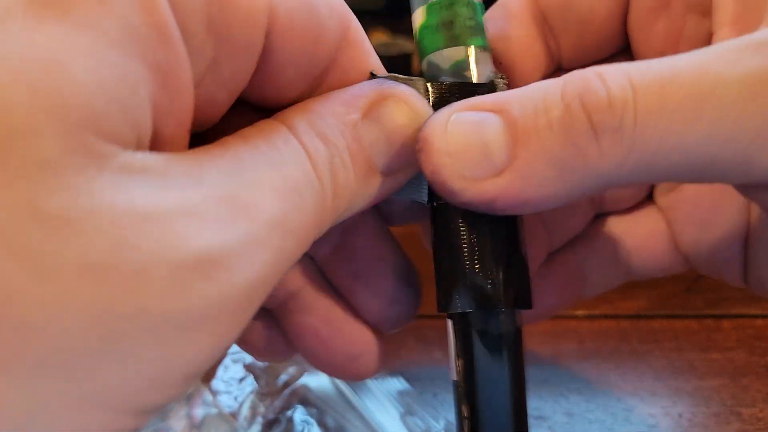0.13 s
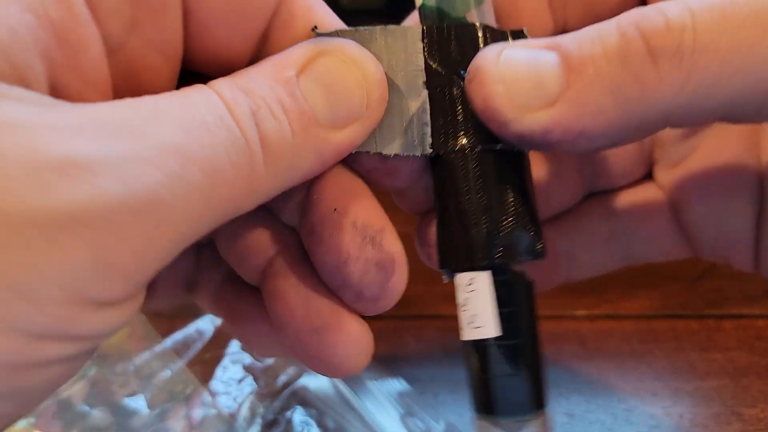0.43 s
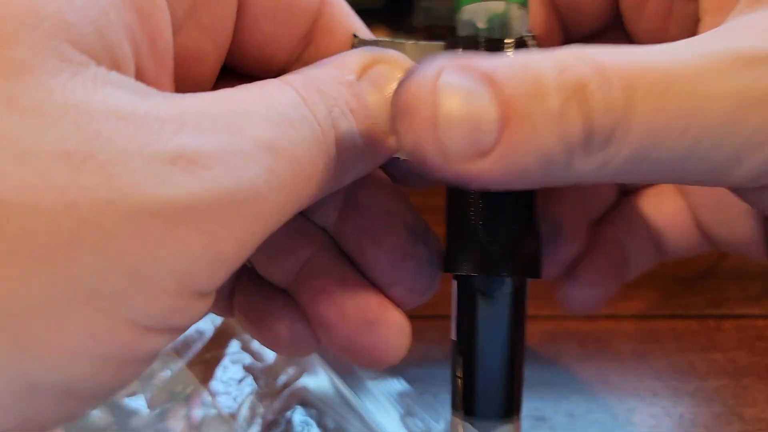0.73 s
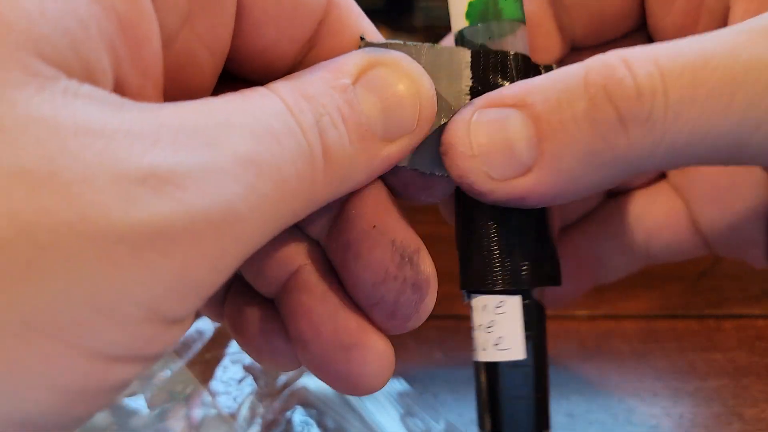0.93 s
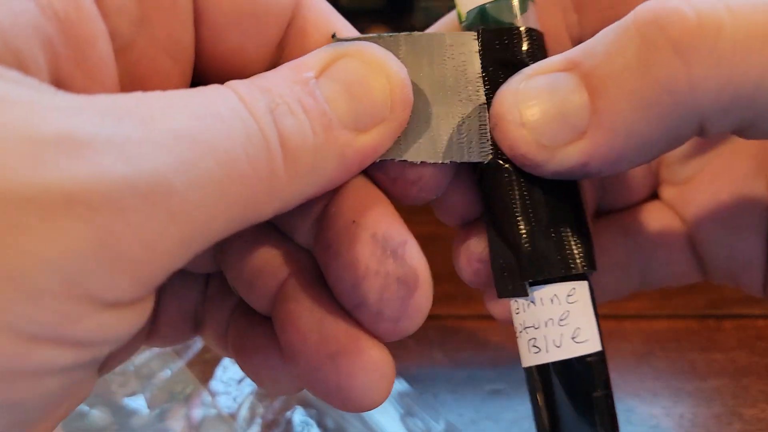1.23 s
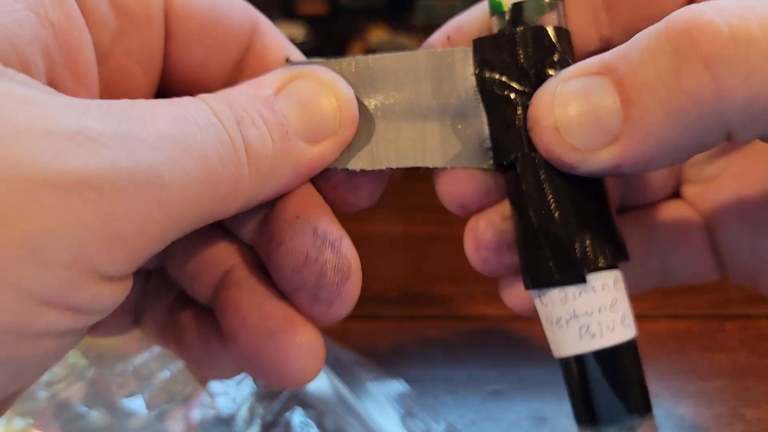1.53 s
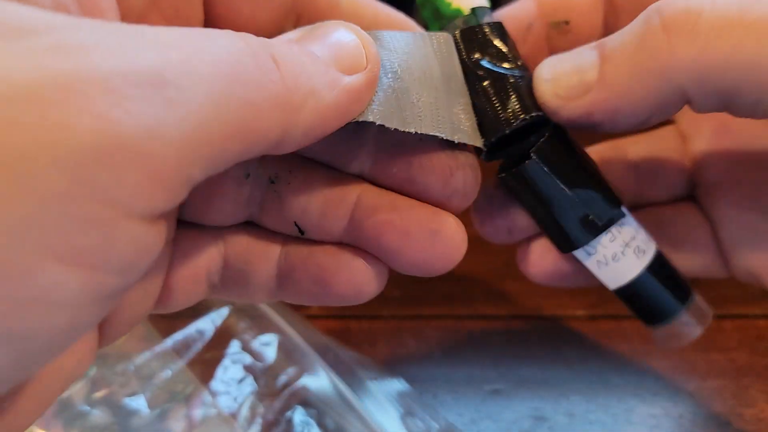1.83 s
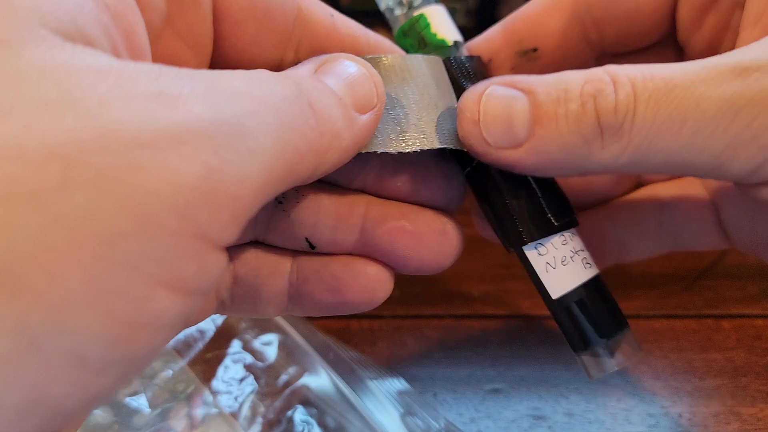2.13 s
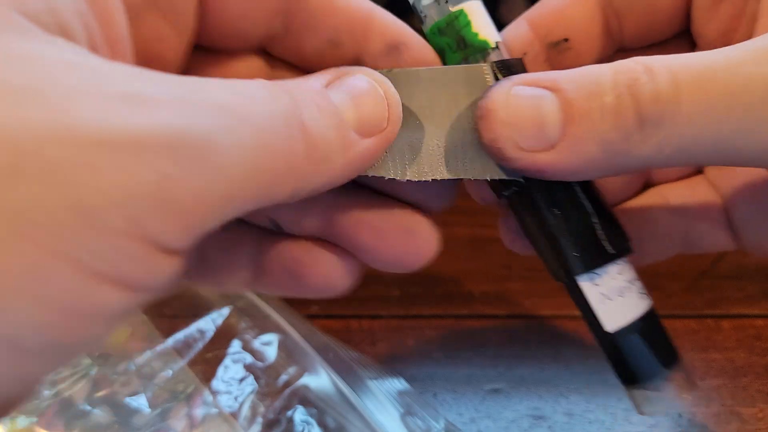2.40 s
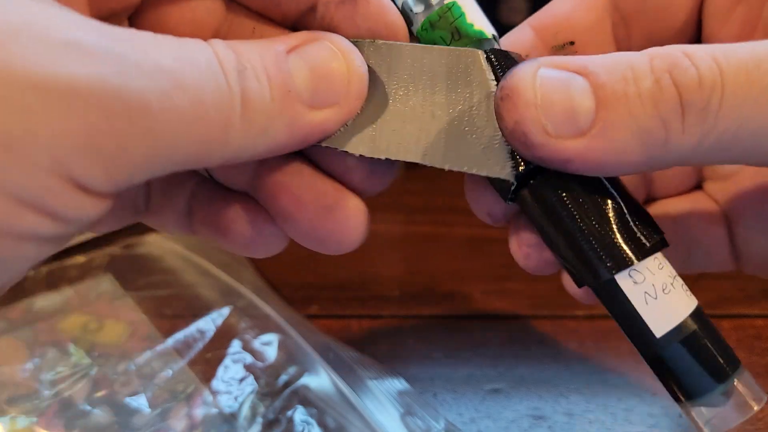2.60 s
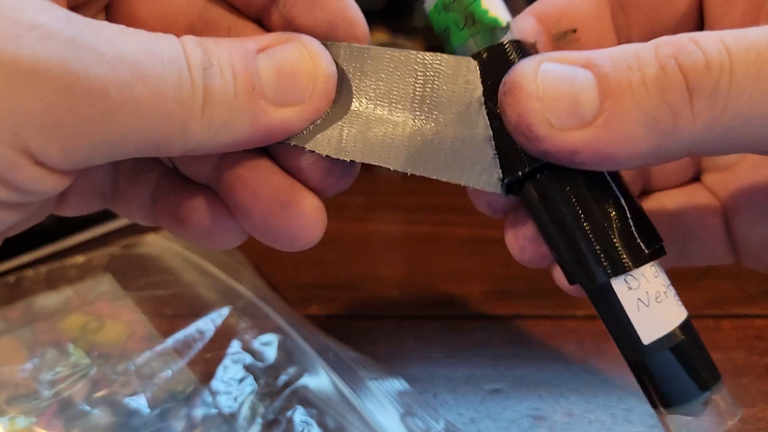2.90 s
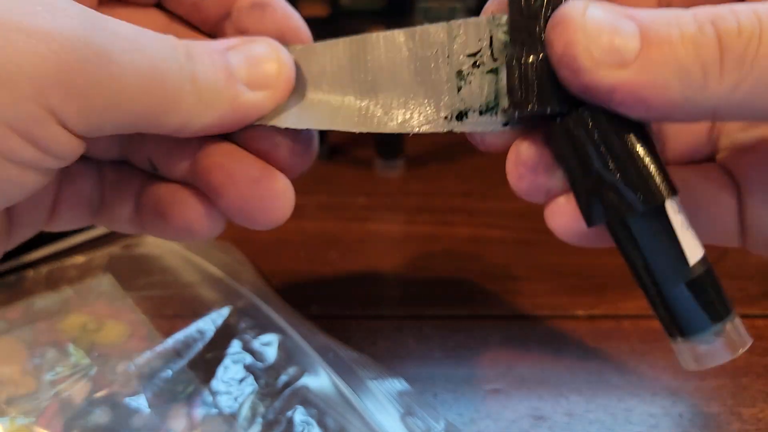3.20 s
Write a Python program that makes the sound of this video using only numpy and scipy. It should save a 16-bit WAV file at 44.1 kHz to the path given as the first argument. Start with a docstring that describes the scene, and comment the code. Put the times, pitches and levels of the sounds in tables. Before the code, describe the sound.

Sticky tape peeled from a glass vial: short hard rips with faint crackle between, indoors

```python
"""At a desk in a small room, duct tape is pulled off small glass vials close to a stereo microphone.
Glue slips drive the strip's resonance in sharp snaps and short rips, with ticks and crackle between.
Decaying sines make the soft jolts of the hands; shaped noise makes the skin's rustles and squeaks.
Scattered reflections and a short tail answer from the desk and room, over a low hum and hiss."""
import sys
import numpy as np
from scipy import signal
from scipy.fft import rfft, irfft, next_fast_len
from scipy.io import wavfile
from scipy.ndimage import map_coordinates

SR = 44100
rng = np.random.default_rng(int(sys.argv[2]) if len(sys.argv) > 2 else 0)


def waveform_to_disk(signal):
    """Save audio, clipped to [-1, 1], as 16-bit WAV at the path in sys.argv[1]."""
    frames = np.transpose(np.atleast_2d(signal))
    scaled = np.clip(frames, -1, 1) * 32767
    samples = np.round(scaled).astype(np.int16)
    wavfile.write(sys.argv[1], SR, samples)


N = 147735  # samples in the scene
FFT = next_fast_len(N + SR // 2)  # leaves room for half a second of reverberation
HZ = np.fft.rfftfreq(FFT, 1 / SR)
BURST = 4096  # samples in one glue release
BURST_HZ = np.fft.rfftfreq(BURST, 1 / SR)
HALVES = np.array([[1], [-1]]) / 2  # shares a left-right difference between the channels


def amp(db):
    """Decibel law: level to amplitude gain."""
    return 10 ** (np.asarray(db) / 20)


def unit(x):
    """Normalisation: scale to an rms of 1."""
    return x / np.sqrt(np.mean(x ** 2) + 1e-20)


def along(points, hz):
    """Logarithmic frequency scale: interpolate (Hz, value) points along it."""
    point_hz, values = np.transpose(points)
    return np.interp(np.log(hz + 1), np.log(point_hz + 1), values)


def curve(rows):
    """Envelope: interpolate (seconds, value) rows at every sample."""
    return np.interp(np.arange(N) / SR, *np.transpose(rows))


def filtered(x, response):
    """Convolution theorem: multiply the spectrum by a response on the HZ grid."""
    return irfft(rfft(x, FFT) * response, FFT)[..., :N]


def causal(db):
    """Minimum phase: fold the cepstrum so that these gains ring only after the impulse."""
    cepstrum = irfft(np.log(amp(db)))
    half = len(cepstrum) // 2
    cepstrum[1:half] *= 2
    cepstrum[half + 1:] = 0
    return np.exp(rfft(cepstrum))


def wobble(rate):
    """Band-limited fluctuation: a smooth curve through random knots, rate of them a second."""
    knots = rng.standard_normal(int(N * rate / SR) + 4)
    return map_coordinates(knots, [np.arange(N) * rate / SR])


def add(track, s, sound):
    """Superposition: mix a sound into the track from time s."""
    part = track[..., round(s * SR):][..., :sound.shape[-1]]
    part += sound[..., :part.shape[-1]]


# Response of the taut strip. Each row: frequency in Hz, gain in dB.
STRIP_RESPONSE = [(30, -31), (100, -15.5), (280, -14.5), (500, -17), (850, -12), (1500, -4), (2400, -5),
                  (3200, -6.5), (4300, -5), (5400, 0), (6500, -3.5), (8000, -11.5), (10000, -25),
                  (12700, -19.5), (16000, -24)]
# Ring of the vial in cupped hands. Each row: frequency in Hz, width in Hz, lift in dB at full share.
HOLLOW_RING = [(224, 43, 4), (325, 35, 9), (846, 90, 8), (1186, 100, 6), (1600, 510, 4), (4340, 340, 2)]
RING_DB, RING_OCTAVES = 7, .3  # lift and spread of the strip's own ring
BASS_HZ, MIDDLE_HZ, TREBLE_HZ = 486, 1300, 6900  # bass edge, middle centre, treble edge
EVEN = .6  # how strongly the random peaks and dips of the slips' spectrum are levelled


def release(length, ring_hz, bass_db, middle_db, treble_db, hollow):
    """Stick-slip excitation: a quick noisy run of tiny glue slips drives the resonant strip."""
    u = np.arange(BURST) / SR / length
    f = BURST_HZ + 1
    slips = rfft(rng.standard_normal(BURST) * u * np.exp(-2 * u))
    size = np.abs(slips) + 1e-9
    levelling = causal(-EVEN * 20 * np.log10(size + size.mean() / 2))

    hollow_db = sum(lift / (1 + (2 * (f - hz) / width) ** 2) for hz, width, lift in HOLLOW_RING)
    db = along(STRIP_RESPONSE, f) + hollow * hollow_db
    db = db + RING_DB * np.exp(-(np.log2(f / ring_hz) / RING_OCTAVES) ** 2)
    db = db + bass_db / (1 + (f / BASS_HZ) ** 2)
    db = db + middle_db * np.exp(-np.log2(f / MIDDLE_HZ) ** 2)
    db = db + treble_db / (1 + (TREBLE_HZ / f) ** 6)

    evened = slips * levelling
    return irfft(evened / np.abs(evened).mean() * causal(db))


# Sudden releases of the glue. Each row: start in seconds, relative level in dB, time scale in seconds,
# strip's ring in Hz, bass in dB, middle in dB, treble in dB, left over right in dB, share of hollow ring.
GLUE_SNAPS = [(0.1465, -2, 0.0015, 3700, -2, -6.5, -3, -2.5, 1.1),
              (0.2474, -13, .0014, 3200, -8, 3, 13, 12, 0),
              (0.2492, -1.5, 0.0013, 5200, 11.5, -1, 3.5, -4, 0.47),
              (.2777, -5, .0008, 3300, -5.5, 1, 2, -2.5, 0),
              (0.2956, 0.5, 0.00031, 3800, -0.5, -3, -13, -7.5, 0),
              (1.3597, -6.5, 0.0002, 2500, -3, -4, -24, -2.5, 1.64),
              (1.386, -1, .001, 3700, 1, 2.5, 4, 1.5, 1.5), (1.3882, -.5, .0018, 5300, 1, 2, -1.5, 3, 1.7),
              (2.4953, -25, 0.0024, 4800, 19.5, 4.5, 4.5, 1.5, 0.12),
              (2.9640, -0.5, 0.00079, 4300, 21.5, 7.5, 4.5, -3.5, 0.47),
              (2.9649, -6, 0.001, 4800, -1, 1.5, 0.5, -13.5, 0.42),
              (2.972, -11.5, .0016, 5200, 24, 5, 10, -8.5, 1.46), (2.9748, -6, .003, 4900, 25, 0, 5, 1, 1),
              (2.979, -8, .004, 5200, 21, -13, -4, -10, 0.66),
              (2.99, -23, .003, 5400, 11, 3.5, 14.5, 1, 0.21),
              (2.9953, -19.5, 0.0039, 5400, 7, 6, 3, -0.5, 0.043),
              (3.0203, -22.5, .003, 5600, 24.5, -0.5, 7.5, -7, 0.21)]
SNAP_DB = 12.5  # added to every row's level


def snaps():
    """Sudden energy release: the tape gives way in single snaps or in a run that makes a rip."""
    out = np.zeros((2, N))
    for s, db, length, hz, bass, middle, treble, pan, hollow in GLUE_SNAPS:
        gain = amp(SNAP_DB + db + pan * HALVES)
        add(out, s, gain * release(length, hz, bass, middle, treble, hollow))
    return out


# Single glue threads part. Each row: start in seconds, relative level in dB, time scale in seconds,
# strip's ring in Hz, middle in dB, treble in dB.
THREAD_TICKS = [(.0875, -47, .001, 5500, -12, 6), (0.113, -47.5, 0.0044, 5120, 0, -3),
                (0.17, -38, 0.0044, 3980, 4, 16), (0.202, -50, .001, 5000, -15, 22),
                (0.368, -35, 0.002, 3840, 6, 9.5), (.5385, -36.5, 0.00074, 3970, -8, -17),
                (0.596, -39.5, 0.0034, 5090, 8, -6.5), (0.888, -45, 0.0036, 5120, 3, -2),
                (0.9596, -39, 0.0017, 5000, -19, -6), (0.979, -35, 0.00067, 4850, -21, -4),
                (1.073, -40, 0.00078, 5600, -13, -6), (1.085, -38, 0.0058, 5460, 5, -2),
                (1.0955, -25.5, 0.0011, 4930, -31, -7), (1.128, -38.5, .002, 5360, -19, -4),
                (1.136, -33.5, 0.0052, 5140, -9, -12), (1.176, -42, 0.0024, 5500, 1, 3),
                (1.184, -37, .001, 6000, 0, 5), (1.204, -29, 0.0027, 5650, 3, 2.5),
                (1.249, -37, 0.0057, 5800, 8, 1), (1.260, -29.5, 0.0039, 5540, -4, 4),
                (1.283, -20.5, .002, 5600, -18, -2), (1.319, -28.5, .003, 5500, -5, 0.5),
                (1.338, -26.5, 0.0027, 4930, -10, -4), (1.349, -29, .005, 5500, -3, 7),
                (1.524, -34, 0.0024, 4560, -11, -13), (1.586, -35, 0.0014, 5060, -2, -8.5),
                (1.702, -39.5, 0.0072, 5500, 8.5, 6), (1.756, -34, 0.0057, 3800, -1.5, -14),
                (1.763, -29, 0.0027, 2650, -9.5, -15.5), (1.812, -34.5, 0.0017, 4240, -4, -13),
                (1.8998, -36, .002, 6480, 7.5, 0), (2.457, -41, 0.0023, 5500, -5.5, 2),
                (2.613, -49.5, .001, 5400, 11.5, 11.5), (2.6944, -45, 0.00046, 5200, 8.5, 2),
                (2.738, -43, .004, 5000, 1.5, -5.5), (2.899, -46.5, 0.0024, 5500, 3.5, 0),
                (2.938, -46, .001, 5200, -7, 4), (2.943, -26.5, 0.009, 5200, 9, 5.5)]
TICK_DB = 13.5  # added to every row's level


def ticks():
    """Local fracture: small threads of glue part, each a weak release into the strip."""
    out = np.zeros(N)
    for s, db, length, hz, middle, treble in THREAD_TICKS:
        add(out, s, amp(TICK_DB + db) * release(length, hz, 0, middle, treble, 0))
    return out


# Glue crackle under tension. Each row: time in seconds, relative level in dB.
CREEP_LEVEL = [(0, -83), (.07, -78), (.1, -60), (.22, -53), (.37, -57.5), (.42, -76), (.6, -77), (.68, -90),
               (.85, -84), (.91, -72.5), (1.05, -69), (1.12, -63), (1.37, -52), (1.6, -71.5), (1.9, -77),
               (2.0, -97.5), (2.32, -86), (2.365, -71), (2.46, -64), (2.56, -71), (2.82, -70),
               (2.94, -59.5), (3.05, -52), (3.12, -82)]
CREEP_DB = -0.5  # added to every row's level
# Spectrum of the crackle. Each row: frequency in Hz, gain in dB.
CREEP_SPECTRUM = [(300, -36.5), (1000, -17), (1800, -5.5), (3000, -10.5), (4700, 1), (6200, 0),
                  (8500, -11.5), (11000, -18), (14000, -14.5), (16000, -20.5)]
CREEP_PER_S, CREEP_SPREAD_DB = 800, 5  # mean rate of grains, spread of their levels
CLUMPS_PER_S, CREEP_CLUMP_DB = 90, 4  # knots and depth of the slower fluctuation


def creep():
    """Random impulse process: dense faint crackle of the glue while the strip is under tension."""
    present = rng.random(N) < CREEP_PER_S / SR
    signs = rng.choice([-1, 1], N)
    sizes = amp(CREEP_SPREAD_DB * np.clip(rng.standard_normal(N), -2, 2))
    grains = present * signs * sizes * amp(CREEP_CLUMP_DB * wobble(CLUMPS_PER_S))
    crackle = unit(filtered(grains, causal(along(CREEP_SPECTRUM, HZ))))
    return crackle * amp(curve(CREEP_LEVEL) + CREEP_DB)


# Skin rustles on the tape. Each row: time in seconds, level in dB before the flutter.
HANDLING_LEVEL = [(0, -78), (.33, -64), (.45, -62.5), (.6, -71), (.72, -81), (1.1, -76), (1.55, -63),
                  (1.68, -70), (1.95, -83), (2.3, -84), (2.6, -71.5), (2.75, -63.5), (2.85, -72.5),
                  (3.15, -80.5), (3.35, -86)]
# Spectrum of the rustle. Each row: frequency in Hz, gain in dB.
HANDLING_SPECTRUM = [(100, -29), (400, 2.5), (700, -8.5), (1500, -4), (2300, -4), (4000, -13), (6000, -3.5),
                     (9000, -36.5), (16000, -30.5)]
HANDLING_FLUTTER_DB = 3


def handling():
    """Friction noise: fingers shift their grip with a soft, uneven rustle."""
    rustle = unit(filtered(rng.standard_normal(N), amp(along(HANDLING_SPECTRUM, HZ))))
    return rustle * amp(curve(HANDLING_LEVEL) + HANDLING_FLUTTER_DB * wobble(56))


# Fingers slip on the vial. Each row: centre in seconds, level in dB, pitch in Hz, half length in seconds.
FINGER_RUBS = [(1.51, -51.5, 1010, 0.0028), (2.456, -59, 855, 0.017)]
RUB_WIDTH_HZ = 206  # distance from the pitch at which the gain has halved


def rubs():
    """Band-limited friction: brief soft squeaks of skin on the vial."""
    t = np.arange(N) / SR
    out = np.zeros(N)
    for s, db, hz, half in FINGER_RUBS:
        band = 1 / (1 + ((HZ - hz) / RUB_WIDTH_HZ) ** 4)
        squeak = unit(filtered(rng.standard_normal(N), band))
        out += amp(db) * np.exp(-((t - s) / half) ** 2) * squeak
    return out


# The hands jerk as the tape gives. Each row: start in seconds, starting level in dB, frequency in Hz.
HAND_JOLTS = [(1.389, -37, 43.5), (1.393, -45.5, 123.2), (2.968, -37, 70.4), (3.026, -49.5, 48.6)]
JOLT_T60_S = .1  # time to fall by 60 dB


def jolts():
    """Damped oscillation: a soft low push as the hands jerk apart."""
    out = np.zeros(N)
    t = np.arange(SR // 4) / SR
    for s, db, hz in HAND_JOLTS:
        add(out, s, amp(db - 60 * t / JOLT_T60_S) * np.sin(2 * np.pi * hz * t))
    return out


# The two microphone ports. Each row: frequency in Hz, left over right in dB, left's phase lead in radians.
MICROPHONE_PORTS = [(100, -4, .3), (300, -2, .4), (850, 0, .6), (1700, -1, 1.8), (2600, -3, 2.4),
                    (3800, -1, 2.1), (4800, 1, 1.8), (5700, 4, 2.2), (7500, 7, 4.3), (10000, 1, 5.3),
                    (12700, -12, 7.3), (16000, -8, 8.3)]
PORT_LEAN = np.array(MICROPHONE_PORTS)[:, :2]
PORT_LEAD = np.array(MICROPHONE_PORTS)[:, ::2]


def ports(x):
    """Interaural-style phase difference: direct sound reaches the left port first."""
    return filtered(x, np.exp(1j * HALVES * along(PORT_LEAD, HZ)))


# Desk and near surfaces. Each row: delay in seconds, level in dB before the room's colour.
NEAR_SURFACES = [(.0065, -23.5), (0.0144, -22.5)]
# Decay of the tail. Each row: frequency in Hz, time to fall by 60 dB in seconds.
TAIL_T60 = [(150, 0.33), (600, 0.32), (1500, 0.18), (4500, 0.19), (9000, 0.19), (15000, 0.15)]
# Colour of the whole room answer. Each row: frequency in Hz, gain in dB.
ROOM_SPECTRUM = [(100, -25), (600, -2.5), (1500, 1), (4500, 6.5), (8000, 2), (14000, 12.5)]
ROOM_DB, EARLY_DB, EARLY_T60_S = -15.5, -12, 0.02  # tail and early levels before the room's colour


def room(x):
    """Reverberation: near reflections, dense early scatter and a tail of frequency-dependent decay."""
    size = SR // 2
    hz, t, z = signal.stft(rng.standard_normal((2, size)), SR, nperseg=256)
    decay = amp(-60 * t / along(TAIL_T60, hz)[:, None])
    tail = signal.istft(z * decay, SR, nperseg=256)[1][:, :size]
    t = np.arange(size) / SR
    early = rng.standard_normal((2, size)) * amp(-60 * t / EARLY_T60_S)
    answer = amp(ROOM_DB) * tail / np.linalg.norm(tail[0])
    answer += amp(EARLY_DB) * early / np.linalg.norm(early[0])
    for s, db in NEAR_SURFACES:
        scatter = rng.standard_normal((2, SR // 1000))  # each reflection is smeared over 1 ms
        add(answer, s, amp(db) * scatter / np.linalg.norm(scatter[0]))
    return filtered(x, rfft(answer, FFT) * amp(along(ROOM_SPECTRUM, HZ)))


# Spectrum of the room noise. Each row: frequency in Hz, relative density in dB.
HUM_SPECTRUM = [(20, -10), (55, 1.5), (100, -2), (240, -14.5), (340, -10), (520, -23), (850, -25),
                (1250, -17), (1800, -22), (2500, -29.5), (3600, -34.5), (4600, -32), (5400, -23),
                (6300, -30), (7400, -52.5), (8500, -49), (16000, -49.5)]
HUM_DB = -67
# Likeness of the channels. Each row: frequency in Hz, left-right correlation.
HUM_LIKENESS = [(60, .9), (180, 0.48), (550, 0.5), (1650, 0), (5000, 0.12)]
# Low band of the room noise. Each row: time in seconds, relative level in dB.
DRONE_LEVEL = [(0, -77.5), (.3, -63), (.6, -65), (.8, -67), (1.0, -79.5), (1.25, -73), (1.5, -60),
               (1.65, -61.5), (1.9, -63.5), (2.1, -80), (2.55, -86.5), (2.8, -67.5), (3.15, -66),
               (3.35, -80)]
DRONE_HZ, DRONE_WIDTH_HZ, DRONE_DB = 345, 50, -3.5  # centre, half width, addition to every row
# Faint middle band of the room noise. Each row: time in seconds, level in dB.
WHIRR_LEVEL = [(0, -82), (.6, -78), (.8, -73), (1.1, -78), (1.95, -80), (2.08, -72), (2.42, -72),
               (2.7, -78), (3.35, -76)]
WHIRR_HZ, WHIRR_WIDTH_HZ = 1200, 130  # centre, half width


def room_noise():
    """Partly coherent noise: steady hum and hiss, with a low and a middle band that slowly swell."""
    turn = np.arccos(np.clip(along(HUM_LIKENESS, HZ), -1, 1)) / 2
    mid_side = np.array([np.cos(turn), np.sin(turn)])  # sets the correlation of the two channels

    def pair(gain):
        """Mid-side principle: sum and difference of two independent noises."""
        mid, side = filtered(rng.standard_normal((2, N)), gain * mid_side)
        return unit(np.array([mid + side, mid - side]))

    drone = pair(1 / (1 + ((HZ - DRONE_HZ) / DRONE_WIDTH_HZ) ** 2))
    whirr = pair(1 / (1 + ((HZ - WHIRR_HZ) / WHIRR_WIDTH_HZ) ** 2))
    hum = amp(HUM_DB) * pair(amp(along(HUM_SPECTRUM, HZ)))
    return hum + amp(curve(DRONE_LEVEL) + DRONE_DB) * drone + amp(curve(WHIRR_LEVEL)) * whirr


ROOM_LEAN = 0.45  # share of the ports' level difference that the room sound takes on


def scene():
    """Superposition: direct tape sound and its room, coloured by each port, over the room noise."""
    tape = snaps() + ticks() + creep() + handling() + rubs()
    lean = HALVES * along(PORT_LEAN, HZ)
    direct = filtered(ports(tape + jolts()), amp(lean))
    reflected = filtered(room(tape.mean(axis=0)), amp(ROOM_LEAN * lean))
    return direct + reflected + room_noise()


CLIP_TOP = .85  # amplitude that rounded peaks approach, before the band limit
TOP_HZ = 16400  # band limit


def record(dry):
    """Saturation and band limiting: the recorder rounds high peaks and cuts steeply above its limit."""
    rounded = dry / (1 + (dry / CLIP_TOP) ** 4) ** (1 / 4)
    return filtered(rounded, 1 / (1 + (HZ / TOP_HZ) ** 140))


dry = scene()
out = record(dry)
waveform_to_disk(out)
```